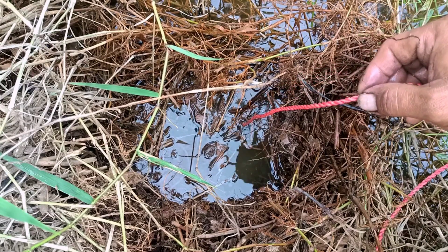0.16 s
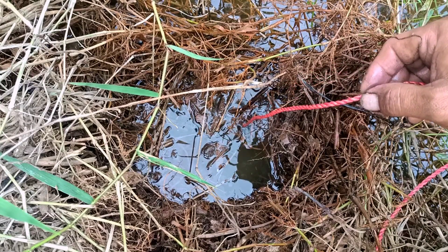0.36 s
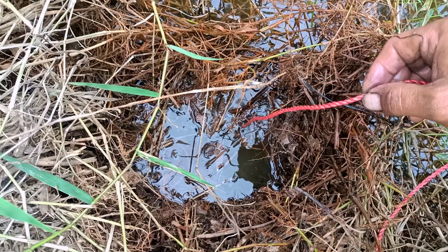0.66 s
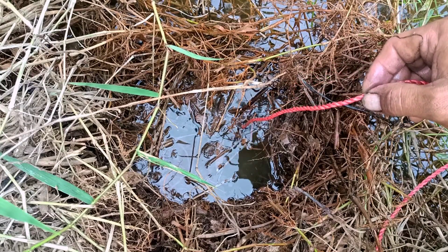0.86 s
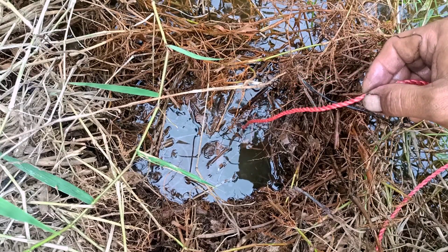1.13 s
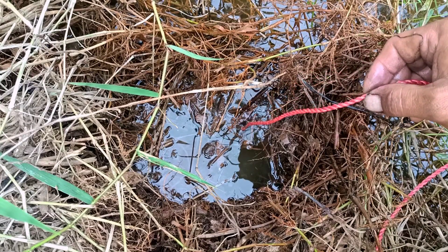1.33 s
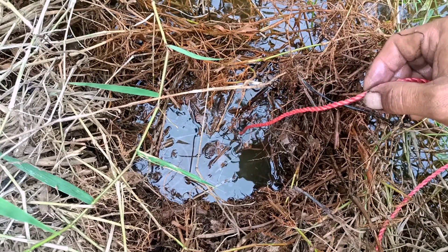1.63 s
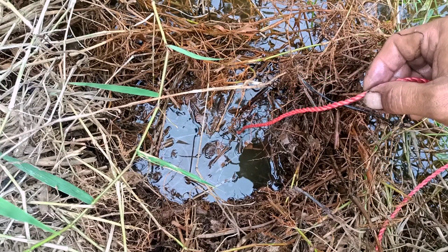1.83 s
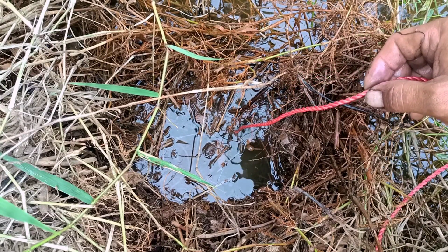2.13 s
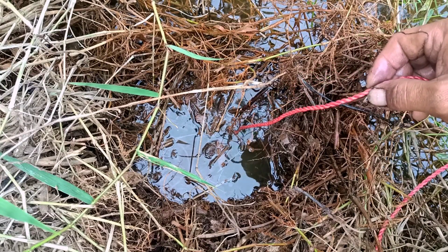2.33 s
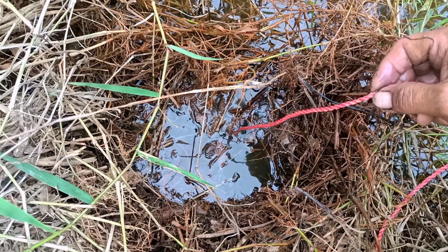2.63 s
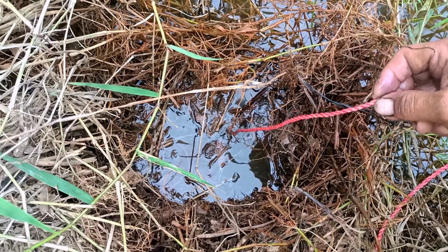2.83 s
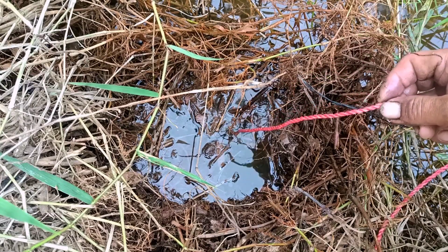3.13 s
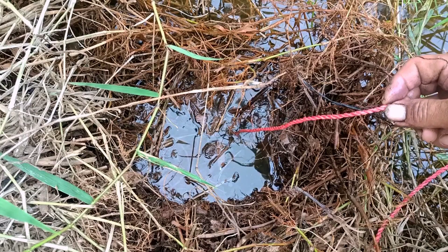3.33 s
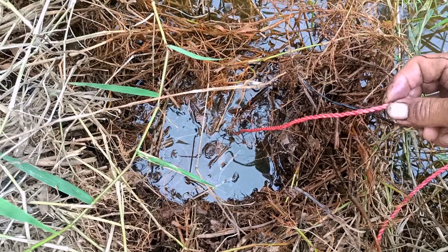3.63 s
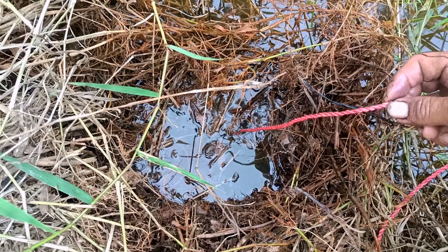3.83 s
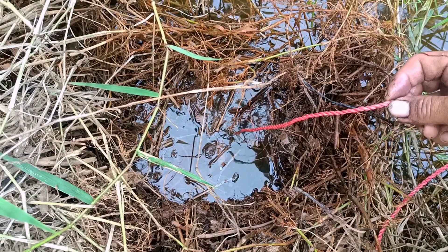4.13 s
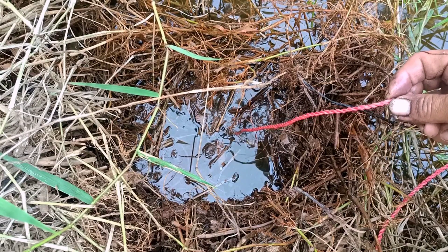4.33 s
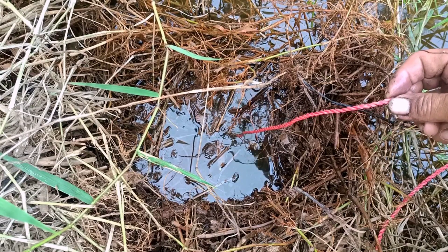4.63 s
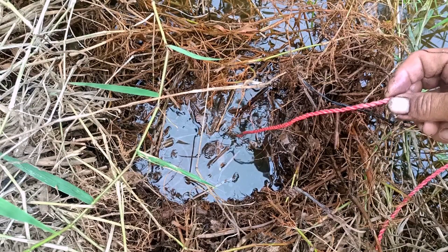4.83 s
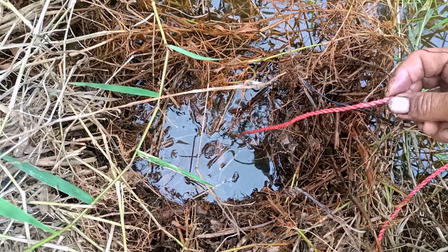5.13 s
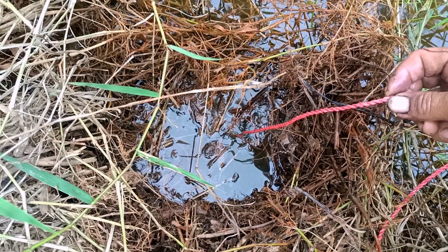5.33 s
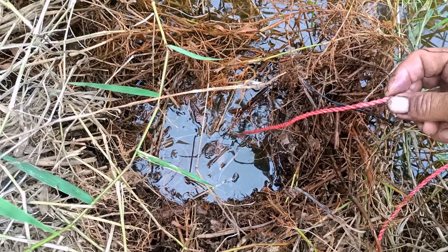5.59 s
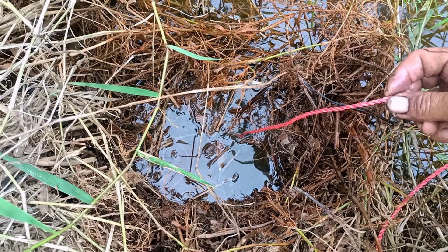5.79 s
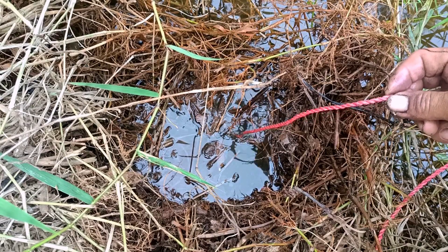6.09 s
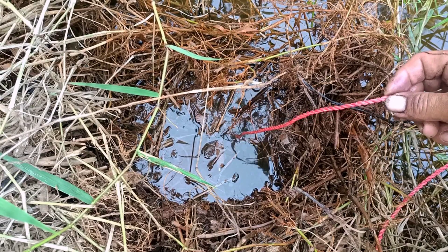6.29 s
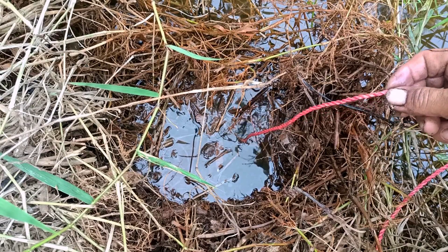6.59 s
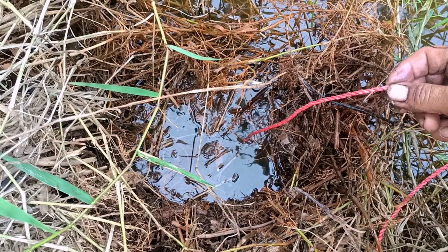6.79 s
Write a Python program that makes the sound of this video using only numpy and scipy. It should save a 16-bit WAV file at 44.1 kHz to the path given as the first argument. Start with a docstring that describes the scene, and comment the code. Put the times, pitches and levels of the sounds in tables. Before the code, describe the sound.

Quiet, high-pitched insect song fills an open field for the whole seven seconds, over a faint distant rumble and soft hiss. On the left, a bush cricket scrapes very high verses, each swelling for about a second before briefly breaking off. On the right, a hoarser one rasps steadily, and a lower cricket sings short pulsing phrases about once a second. At around 1.4 seconds a far bird gives one barely audible peep.

A faint wet tick comes at 3.8 seconds. From about 4.1 to 5.1 seconds, six quick wet smacks follow, with a few faint ones between them. Each is a tiny crackle with sharp snaps, like a wet seal peeling open. They are close, slightly to the right, almost free of echo and much louder than the background, the first being the strongest. The insects then continue alone over the rumble to the end.

```python
"""Insects and wet smacks in a field

A bush cricket scrapes its wings in swelling verses on the left, a hoarser one rasps on the right, and a
cricket sings short phrases of paired pulses over a faint distant rumble. A far bird peeps once.
Close by come six quick wet smacks among a few faint ones: a seal peels in a crackle and lets go in snaps."""
import sys
import numpy as np
from scipy import signal
from scipy.fft import rfft, irfft, next_fast_len
from scipy.io import wavfile
from scipy.ndimage import uniform_filter1d

SR = 44100
rng = np.random.default_rng(int(sys.argv[2]) if len(sys.argv) > 2 else 0)


def unload_wav(signal):
    """Save mono or channel-first audio to the path in sys.argv[1] as 16-bit WAV at rate SR, clipped to [-1, 1]."""
    wavfile.write(
        sys.argv[1],
        SR,
        np.round(np.clip(np.atleast_2d(signal).T, -1, 1) * 32767).astype(np.int16),
    )


N = 306495
TIME = np.arange(N) / SR

# The bed: distant rumble and the hiss on each side. Each row: frequency in Hz, noise density in dB.
RUMBLE_SPECTRUM = [(10, -89), (22, -83.5), (40, -78), (65, -73), (100, -77), (160, -81), (245, -88.5),
                   (320, -99.5), (450, -104), (800, -116), (2000, -140)]
LEFT_HISS = [(40, -91.5), (200, -97), (400, -102), (700, -106.5), (1400, -108), (2200, -113), (3400, -119),
             (4600, -121), (6200, -137), (7200, -123), (8500, -119), (10800, -118), (11400, -137),
             (15000, -141)]
RIGHT_HISS = [(40, -90), (200, -91.5), (400, -101), (700, -104), (1400, -108), (2200, -112), (3400, -118),
              (6000, -118), (9900, -120), (10900, -137), (12600, -124), (13700, -122), (14200, -116),
              (15400, -121)]
# Wing resonances of the two bush crickets. Each row: frequency in Hz, gain in dB.
LEFT_WING_EQ = [(7000, -54.5), (8500, -29), (9200, -13), (9600, -1), (9890, 0.5), (10150, -6.5),
                (10500, -17.5), (11000, -40.5), (11400, -57.5)]
RIGHT_WING_EQ = [(5600, -31), (6200, -28), (6450, -8.5), (6750, -5.5), (7000, 2.5), (7180, 0),
                 (7450, -13.5), (8000, -20), (8800, -50.5)]
# The left bush cricket's verses. Each row: start and end in seconds, full level in dB.
LEFT_VERSES = [(-.1, 0.997, -59.5), (1.034, 2.085, -59.5), (2.074, 3.076, -59), (3.241, 4.26, -59.5),
               (4.27, 5.205, -59.5), (5.226, 6.351, -58.5), (6.365, 7.397, -60)]
# The hoarse one's nearly steady fader. Each row: time in seconds, level in dB.
HOARSE_LEVELS = [(0, -68.5), (1.2, -70), (5.6, -67), (6.95, -69)]
# The cricket's phrases. Each row: start and end in seconds, level in dB.
CRICKET_PHRASES = [(-.12, 0.364, -68), (0.971, 1.47, -70), (2.128, 2.529, -67.5), (3.251, 3.641, -69),
                   (4.29, 4.681, -68.5), (5.363, 5.791, -69), (6.489, 6.901, -70)]
# The smacks, voiced as the slack, open seal. Each row: start and end in seconds, crackle level in dB,
# boosts for low pop, cavity ring and treble in dB, cavity pitch in Hz.
WET_SMACKS = [(3.84, 3.866, -64, -15, 3, 15.5, 3540), (4.058, 4.075, -65, 17, -28, -26, 2730),
              (4.132, 4.19, -31, 1, -7.5, 4, 3280), (4.298, 4.335, -47.5, 14, -14, -9.5, 3070),
              (4.477, 4.529, -38.5, 5, -4.5, -2.5, 3140), (4.569, 4.582, -61, 0.5, 7, -20, 3040),
              (4.655, 4.673, -49.5, 9, -13, -6.5, 2860), (4.764, 4.776, -63, 12, -33, -26, 2760),
              (4.826, 4.867, -39, 12.5, -9.5, -6, 2800), (5.015, 5.063, -38, 15, -3.5, -1.5, 2940)]
# Snaps that jump out of the smacks. Each row: time in seconds, level in dB, extra cavity ring in dB.
SHARP_SNAPS = [(3.857, -42, 4.5), (4.0596, -53, -9), (4.1359, -24.5, 6), (4.1491, -26, 21),
               (4.1543, -13, 15), (4.165, -11, 3), (4.3225, -24.5, -7.5), (4.3244, -30.5, 14.5),
               (4.4942, -28.5, 4), (4.506, -29, 2.5), (4.512, -24.5, 7), (4.6684, -23.5, 4),
               (4.7737, -49, -5), (4.847, -24, 23), (4.8501, -21, 4.5), (5.018, -27.5, 7),
               (5.0402, -25.5, 12), (5.043, -21.5, 6.5)]
# The broad tone of every click. Each row: frequency in Hz, gain in dB.
CLICK_EQ = [(190, -22), (330, -3), (470, -2), (700, -8.5), (1300, -1.5), (1800, -2), (2300, -2), (3600, -2),
            (4200, -6), (5200, -15), (7000, -13), (9800, -33), (13000, -22), (15500, -17.5)]
# Resonances every click rings with. Each row: centre in Hz, width in Hz, boost in dB.
CLICK_MODES = [(430, 150, 2), (860, 150, 8), (1410, 260, 6), (2320, 220, 5), (7100, 700, 2.5)]
# The smacks' tone on the left against the right. Each row: frequency in Hz, gain in dB.
FAR_SIDE_EQ = [(200, -3), (400, -7), (800, -9), (1300, -5), (2300, -9), (3300, -3.5), (4300, -10),
               (5300, -10), (6800, -26), (9500, 8), (12000, -8), (15000, -18)]


def gain_of(db):
    """Decibels to amplitude."""
    return 10 ** (np.asarray(db) / 20)


def unit_rms(x):
    """Scales to unit rms."""
    return x / np.sqrt(np.mean(x ** 2) + 1e-20)


def curve_db(points, hz):
    """An EQ curve's dB at hz, its points joined on a log-frequency axis."""
    point_hz, db = np.transpose(points)
    return np.interp(np.log(hz + 1), np.log(point_hz + 1), db)


def equalise(x, points):
    """Runs x through an EQ curve."""
    size = next_fast_len(len(x))
    hz = np.fft.rfftfreq(size, 1 / SR)
    return irfft(rfft(x, size) * gain_of(curve_db(points, hz)), size)[:len(x)]


def drift(top_hz):
    """A smooth random wobble of unit rms, up to about top_hz."""
    size = next_fast_len(N)
    rolloff = np.exp(-(np.fft.rfftfreq(size, 1 / SR) / top_hz) ** 2)
    return unit_rms(irfft(rfft(rng.standard_normal(size)) * rolloff)[:N])


def whistle(hz, width_hz):
    """A fuzzy whistle: narrow noise around hz."""
    phase = 2 * np.pi * hz * TIME
    return drift(width_hz) * np.cos(phase) + drift(width_hz) * np.sin(phase)


def add(mix, start_s, sound):
    """Drops a sound into the mix at start_s."""
    part = mix[round(start_s * SR):][:len(sound)]
    part += sound[:len(part)]


def air():
    """A distant rumble shared by both sides, and a soft hiss of each side's own."""
    density_scale = np.sqrt(SR / 2)
    rumble = equalise(rng.standard_normal(N), RUMBLE_SPECTRUM) * gain_of(.21 * drift(7.9))
    hiss = np.array([equalise(rng.standard_normal(N), side) for side in (LEFT_HISS, RIGHT_HISS)])
    return density_scale * (rumble * gain_of([[-.5], [.45]]) + hiss)


def stroke(cycle, centre, width):
    """One smooth wing-stroke swell per cycle; centre and width are shares of the cycle."""
    return np.exp(-(((cycle - centre + .5) % 1 - .5) / width) ** 2)


def verses(soft_start_db=-3.5, swell_s=.9, fade_s=.037, between_db=-65):
    """The left bush cricket's envelope: verses swell and break off, with a faint chirr in between."""
    gain = np.full(N, gain_of(between_db))
    for start, end, db in LEFT_VERSES:
        softness = 1 - np.clip((TIME - start) / swell_s, 0, 1)
        gate = np.clip(np.minimum(TIME - start, end - TIME) / fade_s, 0, 1)
        gain = np.maximum(gain, gate * gain_of(db + soft_start_db * softness))
    return gain


def bush_cricket(pitch_hz=9850, stroke_hz=88.5, sag_hz=900, rough=.53):
    """A scraper drags over a file; the tooth rate sags as each stroke slows, and the wing rings."""
    cycle = np.cumsum(stroke_hz * (1 + .008 * drift(3) + .012 * drift(60))) / SR
    from_middle_s = (cycle % 1 - .5) / stroke_hz
    teeth = np.sin(2 * np.pi * (pitch_hz - .5 * sag_hz * stroke_hz * from_middle_s) * from_middle_s)
    swell = stroke(cycle, centre=.33, width=.36) * gain_of(drift(50))
    clean = unit_rms(equalise(teeth * swell, LEFT_WING_EQ))
    rasp = unit_rms(equalise(rng.standard_normal(N) * (.9 + swell), LEFT_WING_EQ))
    song = unit_rms((1 - rough) * clean + rough * rasp) * verses()
    return song * gain_of([[0], [-36]])  # hard left


def hoarse_bush_cricket(group_hz=19.2, blur=.9):
    """Raspy wing strokes in groups of four, one of them accented, blurred by the grass."""
    cycle = np.cumsum(group_hz * (1 + .0077 * drift(3.4))) / SR
    strokes = blur + stroke(4 * cycle, centre=.5, width=.33)
    accent = 1 + .25 * stroke(cycle, centre=.4, width=.25)
    rasp = unit_rms(equalise(rng.standard_normal(N) * strokes * accent, RIGHT_WING_EQ))
    fader = gain_of(np.interp(TIME, *np.transpose(HOARSE_LEVELS)))
    return rasp * fader * gain_of([[-29], [0]])  # hard right


def cricket(pitch_hz=4810, pair_hz=23.8, sag_hz=220, rough=.28, chorus_db=-80):
    """Phrases of paired pulses swell and stop, each pulse falling in pitch, over a far cricket chorus."""
    first, second = .14, .44  # where the two pulses sit in the cycle
    attack_s, release_s = .11, .0067
    swell, bend_hz = np.zeros((2, N))
    for start, end, db in CRICKET_PHRASES:
        now = (TIME > start) & (TIME < end)
        age, remaining = TIME[now] - start, end - TIME[now]
        cycle = age * pair_hz % 1
        pairs = stroke(cycle, first, width=.1) + stroke(cycle, second, width=.1)
        gate = np.clip(age / attack_s, 0, 1) * np.clip(remaining / release_s, 0, 1)
        swell[now] = gain_of(db) * pairs * gate
        through_pulse = cycle / (second - first) % 1
        bend_hz[now] = sag_hz * (.5 - through_pulse)
    tone = unit_rms(np.sin(2 * np.pi * np.cumsum(pitch_hz + bend_hz) / SR))
    song = swell * unit_rms((1 - rough) * tone + rough * whistle(pitch_hz, 370))
    chorus = gain_of(chorus_db) * np.array([whistle(4790, 354), whistle(4790, 330.7)])
    return song * gain_of([[-11], [0]]) + chorus * gain_of([[-7], [0]])


def bird(start_s=1.43, length_s=.045, pitch_hz=1790, db=-77):
    """One faint peep from a far bird: a note and its octave."""
    t = np.arange(0, length_s, 1 / SR)
    phase = 2 * np.pi * pitch_hz * t
    swell = gain_of(db) * np.sin(np.pi * t / length_s)
    peep = np.zeros(N)
    add(peep, start_s, swell * (np.sin(phase) + np.sin(2 * phase)))
    return peep


def click(pop_db, ring_db, treble_db, cavity_hz, pop_hz=420, size=2048):
    """One click of unit energy: a low pop, a small ringing cavity and a bright edge."""
    def bell(centre_hz, width_hz):
        return 1 / (1 + (2 * (hz - centre_hz) / width_hz) ** 2)

    hz = np.fft.rfftfreq(size, 1 / SR)
    db = curve_db(CLICK_EQ, hz) + sum(boost * bell(centre, width) for centre, width, boost in CLICK_MODES)
    db += pop_db * np.exp(-(np.log((hz + 1) / pop_hz) / .5) ** 2)
    db += (ring_db + 4) * bell(cavity_hz, width_hz=750)
    db += treble_db * np.clip((hz - 3300) / 3000, 0, 1)
    db += 1.5 * unit_rms(uniform_filter1d(rng.standard_normal(len(hz)), size=16))  # every cavity differs
    log_gain = np.log(gain_of(np.r_[db, db[-2:0:-1]]))
    pulse = np.fft.ifft(np.exp(np.conj(signal.hilbert(log_gain)))).real  # minimum phase: a hard attack
    return -pulse / np.linalg.norm(pulse)


def seal_click(age_s, pop_db, ring_db, treble_db, cavity_hz, slacken_s=.015):
    """A click age_s into the peel: thin, ringing, bright and higher until the tight seal slackens."""
    tight = np.exp(-max(age_s, 0) / slacken_s)
    return click(pop_db - 13.5 * tight, ring_db + 16.5 * tight,
                 treble_db + 11 * tight, cavity_hz * (1 + .26 * tight))


def crackles(grains_per_s=2200, crest_share=.22, stages=3):
    """The seal peels in tiny clicks that swell and fade, darker stage by stage; yields (start, sound)."""
    sizes = gain_of(np.minimum(rng.exponential(1, N), 3)) * rng.choice([-1, 1], N)
    grains = sizes * (rng.random(N) < grains_per_s / SR)
    for start, end, db, *voicing in WET_SMACKS:
        peel = grains[round(start * SR):round(end * SR)]
        swell = np.interp(np.linspace(0, 1, len(peel)), [0, crest_share, 1], [.29, 1, .23])
        stage_s = (end - start) / stages
        for k, stage in enumerate(np.array_split(unit_rms(peel * swell), stages)):
            tick = seal_click((k + .5) * stage_s, *voicing)
            yield start + k * stage_s, gain_of(db) * signal.fftconvolve(stage, tick)


def snaps(nominal_length_s=.0028):
    """The seal lets go in sharp snaps, each voiced like its smack; yields (start, sound)."""
    for at_s, db, extra_ring_db in SHARP_SNAPS:
        nearest_smack = min(WET_SMACKS, key=lambda row: abs(row[0] - at_s))
        start, _, _, pop_db, ring_db, treble_db, cavity_hz = nearest_smack
        snap = seal_click(at_s - start, pop_db, ring_db + extra_ring_db, treble_db, cavity_hz)
        yield at_s, gain_of(db) * np.sqrt(nominal_length_s * SR) * snap


def scatter(x, db, t60, size=1000):
    """A short diffuse echo off the ground and stalks nearby."""
    t = np.arange(size) / SR
    tail = rng.standard_normal(size) * gain_of(-60 * t / t60) * np.clip(t / .0001, 0, 1)
    return gain_of(db) * signal.fftconvolve(x, tail / np.linalg.norm(tail))[:len(x)]


def glance(x):
    """On the way to a microphone the highs glance off a hand and its gear, smearing the bright edge."""
    highs = signal.sosfilt(signal.butter(4, 5000, "high", fs=SR, output="sos"), x)
    softened = signal.lfilter(*signal.butter(1, 11000, fs=SR), x)
    smeared = softened + scatter(highs, db=-2.5, t60=.014)
    return smeared + scatter(smeared, db=-7, t60=.015)


def smacks(left_lag_samples=13):
    """Crackles and snaps up close, nearer the right side; the open field adds only a slight tail."""
    left, right = np.zeros((2, N))
    for start, sound in [*snaps(), *crackles()]:
        add(left, start, glance(sound))
        add(right, start, glance(sound))
    left = np.roll(equalise(left, FAR_SIDE_EQ), left_lag_samples)
    return np.array([side + scatter(side, db=-33, t60=.11, size=4000) for side in (left, right)])


def scene():
    """The stereo mix: the field's bed, three insects, a far bird and the close smacks."""
    return air() + bush_cricket() + hoarse_bush_cricket() + cricket() + bird() + smacks()


def record(dry, ceiling=.8, cutoff_hz=15700):
    """Soft clipping rounds the loudest peaks; a steep low-pass takes off the very top."""
    rounded = ceiling * np.tanh(dry / ceiling)
    lowpass = signal.firwin(401, cutoff_hz, window=("kaiser", 9), fs=SR)
    return signal.oaconvolve(rounded, lowpass[None], "same")


dry = scene()
out = record(dry)
unload_wav(out)
```